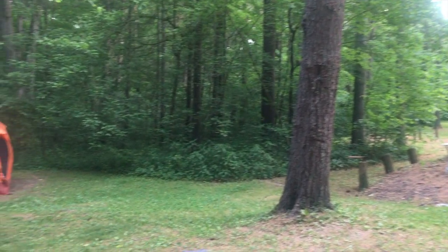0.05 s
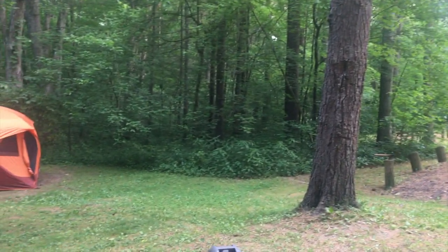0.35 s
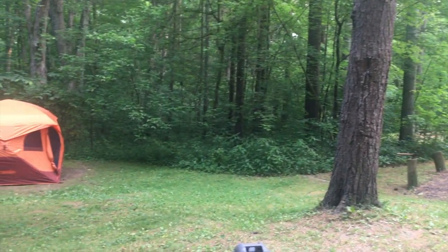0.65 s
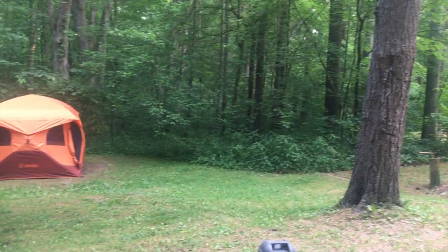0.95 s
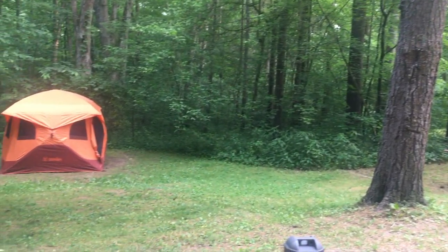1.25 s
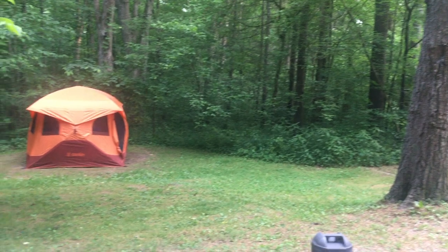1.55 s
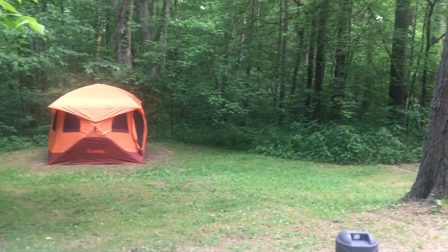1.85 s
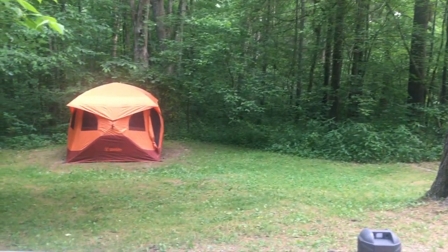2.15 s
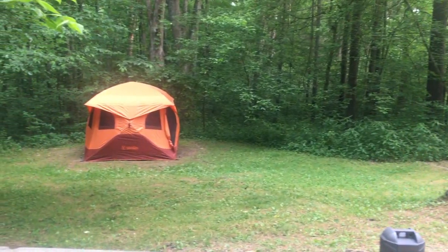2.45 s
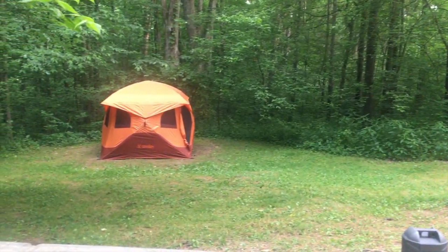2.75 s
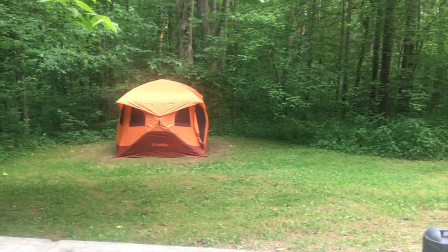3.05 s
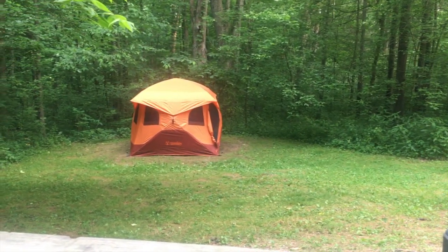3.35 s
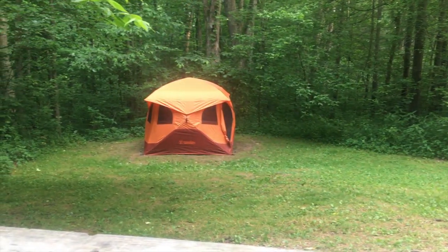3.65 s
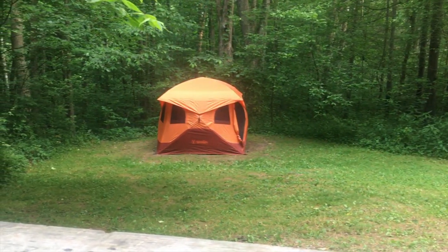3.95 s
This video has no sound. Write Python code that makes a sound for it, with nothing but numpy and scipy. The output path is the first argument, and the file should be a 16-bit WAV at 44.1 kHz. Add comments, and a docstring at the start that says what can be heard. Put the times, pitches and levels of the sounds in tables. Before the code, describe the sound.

A songbird repeats a rising two-note whistle in the woods over steady hiss.

```python
"""A songbird in campsite woods repeats a two-note whistle: a slow low upsweep, then a jump to a short
high one that ends in a flick. A faint falling note follows most calls. Farther off, small birds chip,
buzz and whistle. Each note is a gliding sine; the trunks scatter it into a long tail.
Underneath: a far engine's hum, low rumble and steady hiss."""
import sys
import numpy as np
from scipy import signal
from scipy.fft import rfft, irfft, next_fast_len
from scipy.io import wavfile
from scipy.ndimage import uniform_filter1d

SR = 44100
rng = np.random.default_rng(int(sys.argv[2]) if len(sys.argv) > 2 else 0)


def store_wav(level_fs):
    """Save 16-bit WAV to argv[1]."""
    pcm = np.round(np.clip(np.atleast_2d(level_fs), -1, 1) * 32767)
    wavfile.write(sys.argv[1], SR, pcm.T.astype(np.int16))


N = 176400
LEAD_S = .5  # lets echoes build up before time zero
TIME_S = np.arange(-int(LEAD_S * SR), N) / SR

# Songbird calls. Each row: time of the jump between notes in seconds, low-note length in seconds,
# low-note level in dB, high-note level in dB, direct-path gain in dB, high-note swell in dB,
# swell width in seconds, flick gain over the high note in dB, low-note peak time in seconds from
# the jump, peak gain in dB. Swell and peak act on the direct path only.
CALLS = [(-.06, 0.085, -52, -47.5, -8, 7, .012, -9, -.04, 0),
         (.452, 0.11, -45.5, -45.5, -3.5, -5, 0.013, -1, -0.042, 9.5),
         (1.070, 0.12, -42.5, -43, -3.5, 0.5, 0.0074, 0.5, -0.029, 10.5),
         (1.807, 0.23, -41, -43, -1, 8.5, 0.0054, 3.5, -0.031, 4),
         (2.450, 0.234, -40, -39.5, -1, 7, 0.011, -1.5, -0.023, 5),
         (3.092, 0.22, -37.5, -40.5, -2, 10, .011, 0, -0.042, 2),
         (3.736, 0.26, -38, -42, -2, 7, 0.016, 2, -0.062, 5)]
# The three parts of a call. Each row: time from the jump in seconds, pitch in Hz, gain in dB.
LOW_SWEEP = [(-.205, 1290, -15.5), (-.18, 1385, -17.5), (-.13, 1555, -19), (-.114, 1633, -6.5),
             (-.095, 1700, -3), (-.077, 1763, -16), (-.061, 1860, -1), (-.036, 1948, -8),
             (-.026, 1990, -12.5), (-.015, 1974, -3.5), (-.003, 1900, -19)]
HIGH_SWEEP = [(-.002, 2720, -2), (.005, 2780, -3.5), (.011, 2866, -10), (.017, 2933, 1), (.03, 2983, -5),
              (.04, 3087, -2), (.048, 3112, 0.5), (.055, 3173, -5), (.061, 3384, 2.5)]
FLICK_SWEEP = [(.058, 3266, 0), (.061, 3506, -5), (.064, 3960, -9.5), (.067, 4500, -15)]
# High-note harmonics. Each row: multiple of the pitch, gain in dB.
HIGH_HARMONICS = [(1, 0), (2, -42), (4, -35)]
# Falling notes between calls. Each row: centre time in seconds, level in dB.
FALL_EVENTS = [(.690, -63), (1.275, -60.5), (2.012, -57.5), (2.660, -60), (3.293, -57)]
# One falling note. Each row: time from its centre in seconds, pitch in Hz, gain in dB.
FALL_SWEEP = [(-.018, 1675, -11), (-.005, 1460, -2), (.005, 1350, 3.5), (.014, 1230, -12)]
# How well the song carries through the trees. Each row: frequency in Hz, echo gain in dB.
ECHO_EQ = [(1300, 2.5), (1700, -2.5), (1950, 3), (2750, -3), (3100, 0.5), (3700, 0)]
# Small bird's chips. Each row: start in seconds, top pitch in Hz, level in dB, direct-path gain in dB.
CHIP_EVENTS = [(.163, 7980, -58, 0), (.560, 8470, -57, 6), (1.068, 8420, -55, 0.5),
               (1.512, 8430, -57.5, -1.5), (1.880, 8350, -58, -5), (2.238, 8360, -58, -5),
               (2.598, 8360, -57, -3), (2.795, 8457, -54.5, -4), (3.002, 8370, -54.5, -8)]
# One chip. Each row: time in seconds, fraction of the top pitch, gain in dB.
CHIP_SWEEP = [(0, .86, -5.5), (.004, .93, -8.5), (.007, 0.99, -3.5), (.010, .98, -7.5), (0.014, 0.9, -6)]
# Another bird's buzzes. Each row: start in seconds, length in seconds, centre pitch in Hz, level in dB.
BUZZ_EVENTS = [(3.406, 0.032, 7080, -60.5), (3.659, 0.026, 7040, -57), (3.94, 0.029, 7180, -57)]
# Lisp into the last buzz. Each row: time in seconds, pitch in Hz, level in dB.
LISP_SWEEP = [(3.911, 4195, -61), (3.917, 5970, -56), (3.921, 6746, -66), (3.926, 6010, -53),
              (3.932, 6435, -67), (3.938, 5914, -51)]
# Faint whistles: far birds, then in the last row the 1.1 kHz opening of a songbird low upsweep.
# Each row: start in seconds, length in seconds, start and end pitch in Hz, level in dB.
FAINT_EVENTS = [(0.278, 0.17, 6130, 5930, -75.5), (.68, .2, 3750, 4250, -72.5),
                (1.08, .1, 2105, 2115, -66.5), (1.295, .09, 5965, 5945, -70), (1.52, .1, 4780, 4600, -73.5),
                (1.598, .22, 5960, 5670, -75.5), (1.66, .14, 5500, 5250, -77), (1.84, .1, 4480, 4280, -69),
                (1.98, .10, 5200, 5120, -74), (2.84, 0.051, 1080, 1128, -60)]
# Distinct echoes off big trunks. Each row: delay in seconds, gain in dB.
TRUNK_ECHOES = [(.024, -14.5), (.062, -15.5)]
# Engine firing tone. Each row: time in seconds, level in dB before trim, pitch in Hz.
ENGINE_TRACK = [(0.0, -61.5, 102.4), (0.26, -58, 105.6), (1.51, -51.5, 105.7), (1.61, -58, 104.2),
                (2.06, -50, 106.3), (2.17, -65, 108.9), (2.42, -51.5, 108.4), (2.49, -62, 108.1),
                (2.77, -51, 108.1), (3.3, -53.5, 108.6), (3.43, -54.5, 104.5), (3.751, -57, 108.3),
                (3.891, -51.5, 107.6), (4.0, -60, 104.1)]
# Rumble and hiss spectrum. Each row: frequency in Hz, relative density in dB.
AIR_SPECTRUM = [(22, -23), (45, -5.5), (65, 2.5), (90, -2.5), (150, -5.5), (220, -11), (310, -17),
                (450, -21.5), (750, -21), (1300, -24.5), (2300, -28.5), (3200, -26.5), (4900, -34.5),
                (7000, -36), (9500, -38), (10400, -42), (11500, -37.5), (15500, -39)]
# Rumble contour. Each row: time in seconds, gain in dB.
RUMBLE_TRACK = [(0, 0.5), (.7, -0.5), (1.7, 1.5), (2.15, -4), (2.4, 2.5), (2.8, 4), (3.15, 0.5), (3.5, 3.5),
                (4, -4.5)]

WOODS_T60_S, TREBLE_T60_S = 1.1, .69


def whistler(fade_s=.054, swell_at_s=.0442, peak_width_s=.0078, flutter_db=1.5, flutter_hz=128.4):
    """Songbird: low upsweep, high upsweep, flick and fall, heard directly and off leaves and trunks."""
    low_wet_db, high_wet_db, flick_direct_db, splash_db = -5, .5, -4, -2
    lows, highs, flicks, direct = 0, 0, 0, 0
    for at_s, low_s, low_db, high_db, direct_db, swell_db, swell_s, flick_db, peak_s, peak_db in CALLS:
        t = TIME_S - at_s
        fade_in = np.clip((t + low_s) / fade_s, 0, 1)
        low = undb(low_db) * fade_in * note(LOW_SWEEP, at_s)
        high = undb(high_db) * note(HIGH_SWEEP, at_s, HIGH_HARMONICS)
        flick = undb(high_db + flick_db) * note(FLICK_SWEEP, at_s)
        swell = undb(swell_db * np.exp(-((t - swell_at_s) / swell_s) ** 2))
        peak = undb(peak_db * np.exp(-((t - peak_s) / peak_width_s) ** 2))
        direct += undb(direct_db) * (peak * low + swell * high + undb(flick_direct_db) * flick)
        lows, highs, flicks = lows + low, highs + high, flicks + flick
    falls = sum(undb(db) * note(FALL_SWEEP, at_s, waver=.032) for at_s, db in FALL_EVENTS)
    direct *= undb(flutter_db * walk(flutter_hz))
    splash = undb(splash_db) * leaves(flicks)
    scattered = undb(low_wet_db) * (lows + falls) + undb(high_wet_db) * highs + flicks
    return direct + splash + falls + woods(equalise(scattered, ECHO_EQ), WOODS_T60_S)


def chipper(wet_db=4.5):
    """Very short hooked upsweeps, some screened by leaves."""
    chips, direct = 0, 0
    for at_s, top_hz, level_db, direct_db in CHIP_EVENTS:
        chip = undb(level_db) * note([(s, share * top_hz, db) for s, share, db in CHIP_SWEEP], at_s)
        chips += chip
        direct += undb(direct_db) * chip
    return direct + undb(wet_db) * woods(chips, TREBLE_T60_S)


def buzzer(vibrato_hz=140, depth_hz=470, roughness=.3, wander_hz=221, wet_db=4.5):
    """High notes with fast, uneven vibrato, mostly echo. A lisp leads into the last."""
    buzzes = 0
    for at_s, length_s, centre_hz, db in BUZZ_EVENTS:
        vibrato = np.sin(phase_rad(vibrato_hz * (1 + roughness * walk(300))))
        pitch_hz = centre_hz + depth_hz * vibrato + wander_hz * walk(400)
        buzzes += undb(db) * gate(at_s, at_s + length_s) * np.sin(phase_rad(pitch_hz))
    lisp = note(LISP_SWEEP)
    return buzzes + lisp + woods(undb(wet_db) * buzzes + lisp, TREBLE_T60_S)


def faint_whistles(direct_db=-13):
    """Far birds' whistles and loose chorus, plus the opening of one songbird upsweep; mostly echo."""
    song = sum(note([(0, start_hz, db), (length_s, end_hz, db)], at_s)
               for at_s, length_s, start_hz, end_hz, db in FAINT_EVENTS)
    from_s, to_s, low_hz, high_hz = .65, 1.9, 3510, 6750
    glide_s, max_glide, chorus_db = .065, .14, -76.5
    for when, height, slope in rng.random(size=(36, 3)):
        start_hz = low_hz + height * (high_hz - low_hz)
        end_hz = start_hz * (1 + max_glide * (2 * slope - 1))
        at_s = from_s + when * (to_s - from_s)
        song += note([(0, start_hz, chorus_db), (glide_s, end_hz, chorus_db)], at_s)
    return undb(direct_db) * song + woods(song, WOODS_T60_S)


def note(sweep, at_s=0, harmonics=((1, 0),), waver=.0044):
    """Wavering whistle along (s, Hz, dB) points; waver is a fraction of the pitch."""
    s, hz, db = np.array(sweep, float).T
    whistle = gate(at_s + s[0], at_s + s[-1])
    on = whistle > 0
    t = TIME_S[on] - at_s
    phase = phase_rad(np.interp(t, s, hz) * (1 + waver * walk(200)[on]))
    tone = sum(undb(gain_db) * np.sin(k * phase) for k, gain_db in harmonics)
    whistle[on] *= undb(np.interp(t, s, db)) * tone
    return whistle


def leaves(x, decay_s=.0098):
    """Foliage close to the bird smears a quick sound into a splash."""
    t = np.arange(SR // 10) / SR
    spray = rng.standard_normal(len(t)) * np.exp(-t / decay_s)
    return signal.fftconvolve(x, spray / np.linalg.norm(spray))[:len(x)]


def woods(x, t60_s, gap_s=.0065, early_per_s=200, early_decay_s=.064, early_db=-4):
    """Echoes only: a few from near trunks, then a patchy fading wash."""
    t = np.arange(int(1.5 * SR)) / SR
    wash = rng.standard_normal(len(t)) * undb(1.1 * walk(34.7)[:len(t)] - 60 * t / t60_s)
    wash *= np.clip(t / gap_s - 1, 0, 1)
    early = rng.standard_normal(len(t)) * (rng.random(len(t)) < early_per_s / SR)
    early *= np.exp(-t / early_decay_s) * (t > gap_s)
    response = wash / np.linalg.norm(wash) + undb(early_db) * early / np.linalg.norm(early)
    for delay_s, db in TRUNK_ECHOES:
        response[int(delay_s * SR)] += undb(db)
    return signal.fftconvolve(x, response / np.linalg.norm(response))[:len(x)]


def engine(trim_db=.5, flutter_db=1.65, octave_db=-65, octave_flutter_db=3.16, wander=.005):
    """Far engine: firing tone and its octave, each fading in and out on the way."""
    s, db, hz = np.array(ENGINE_TRACK).T
    phase = phase_rad(np.interp(TIME_S, s, hz) * (1 + wander * walk(12)))
    firing = undb(np.interp(TIME_S, s, db) + trim_db + flutter_db * walk(12)) * np.sin(phase)
    octave = undb(octave_db + octave_flutter_db * walk(9)) * np.sin(2 * phase)
    return np.sqrt(2) * (firing + octave)


def air(level_db=-54, floor_hz=15, rumble_hz=114, sway_db=1):
    """Swaying low rumble under a steady hiss."""
    n = len(TIME_S)
    hz = np.fft.rfftfreq(n, 1 / SR)
    spectrum = rfft(rng.standard_normal(n)) * eq_gain(hz, AIR_SPECTRUM) * (hz > floor_hz)
    steady = irfft(spectrum, n)
    rumble = irfft(spectrum / (1 + (hz / rumble_hz) ** 2), n)
    sway = undb(np.interp(TIME_S, *np.array(RUMBLE_TRACK).T) + sway_db * walk(4.01))
    return undb(level_db) * (steady + (sway - 1) * rumble) / steady.std()


def undb(db):
    """Decibels to gain."""
    return 10 ** (np.asarray(db) / 20)


def phase_rad(hz):
    """Running phase of a varying pitch."""
    return 2 * np.pi * np.cumsum(hz) / SR


def walk(rate_hz):
    """Smooth random drift, spread near 1."""
    hold = max(int(SR / rate_hz), 2)
    steps = np.repeat(rng.standard_normal(len(TIME_S) // hold + 1), hold)
    return 1.288 * uniform_filter1d(uniform_filter1d(steps, hold), hold)[:len(TIME_S)]


def gate(start_s, end_s, edge_s=.0028):
    """On between two times, with ramped edges."""
    return np.clip(np.minimum(TIME_S - start_s, end_s - TIME_S) / edge_s, 0, 1)


def eq_gain(hz, points):
    """Gain through (Hz, dB) points, on a log frequency axis."""
    point_hz, db = np.array(points).T
    return undb(np.interp(np.log(np.maximum(hz, 1)), np.log(point_hz), db))


def equalise(x, points):
    """Zero-phase filter from (Hz, dB) points."""
    size = next_fast_len(2 * len(x))
    gain = eq_gain(np.fft.rfftfreq(size, 1 / SR), points)
    return irfft(rfft(x, size) * gain, size)[:len(x)]


def scene():
    """Birds over the background, mono, lead-in dropped."""
    return (air() + engine() + whistler() + chipper() + buzzer() + faint_whistles())[None, -N:]


def record(dry):
    """Steep low-pass on the top treble."""
    cutoff_hz = 15700
    return signal.sosfilt(signal.ellip(10, .2, 70, cutoff_hz, fs=SR, output="sos"), dry)


dry = scene()
out = record(dry)
store_wav(out)
```